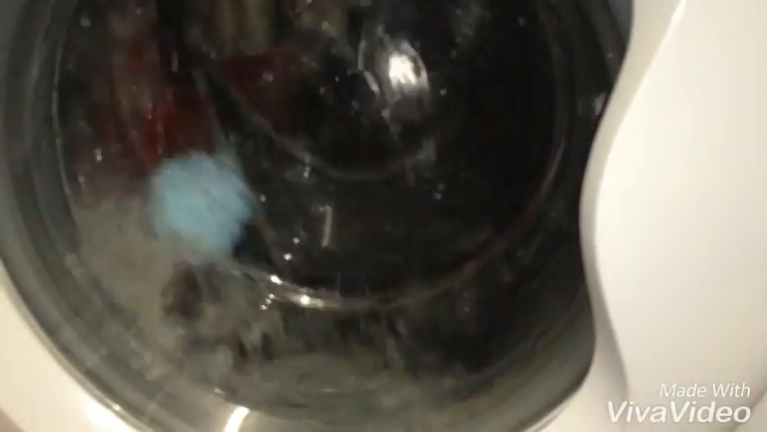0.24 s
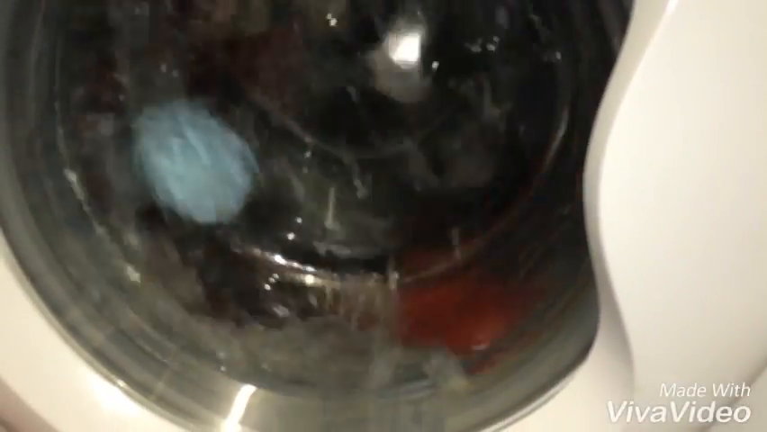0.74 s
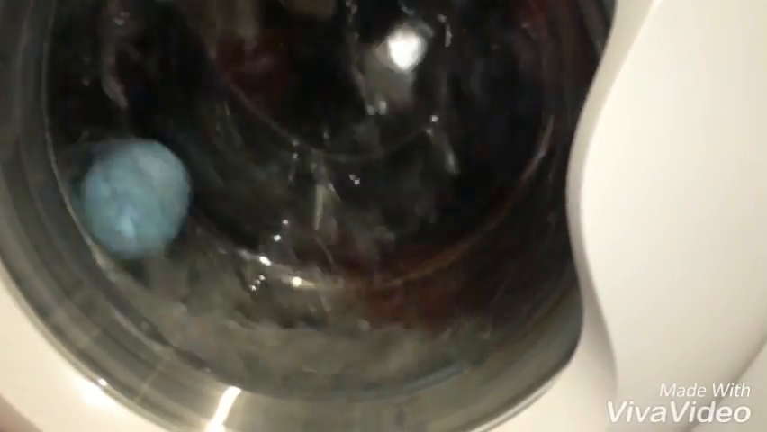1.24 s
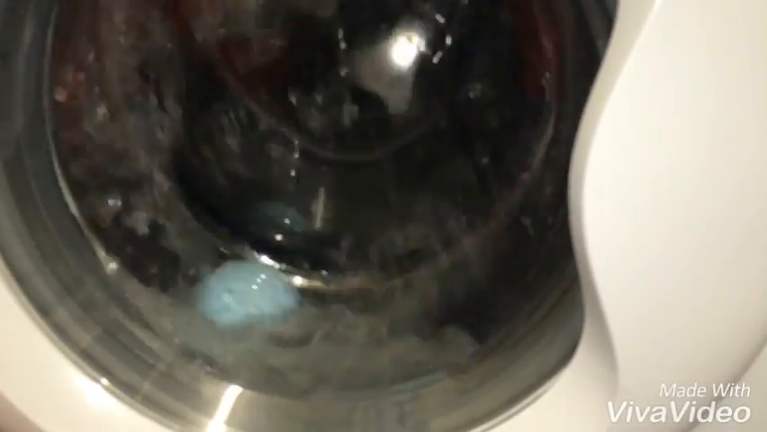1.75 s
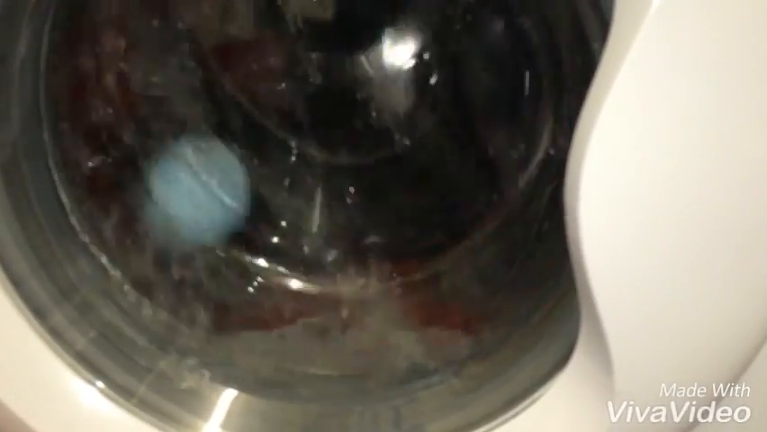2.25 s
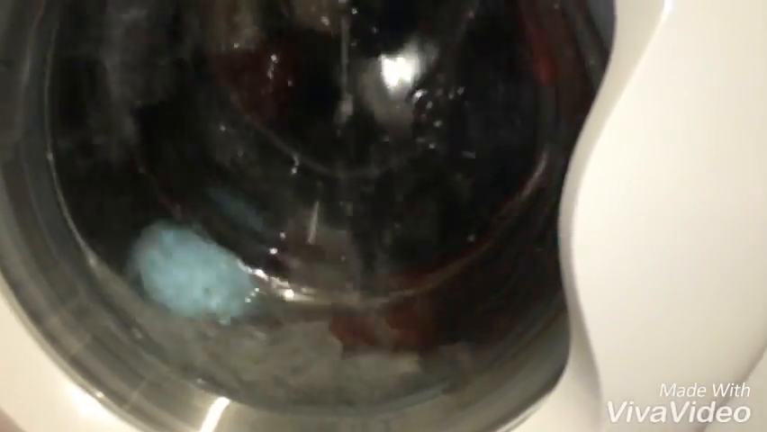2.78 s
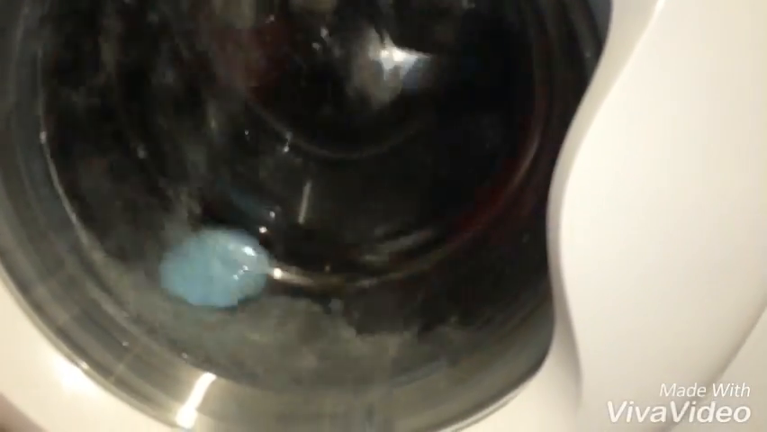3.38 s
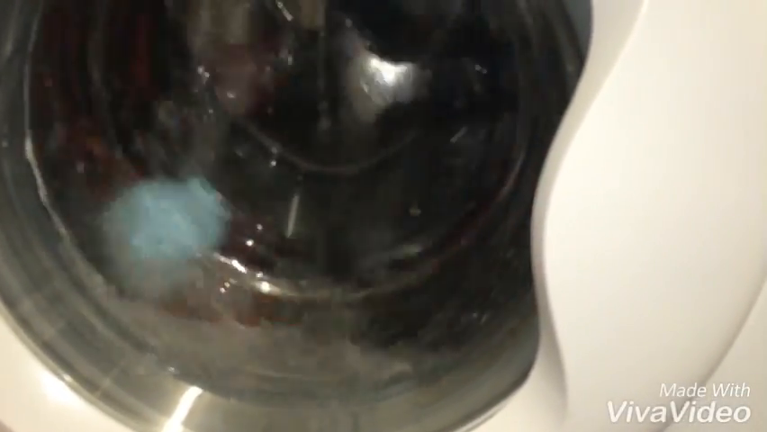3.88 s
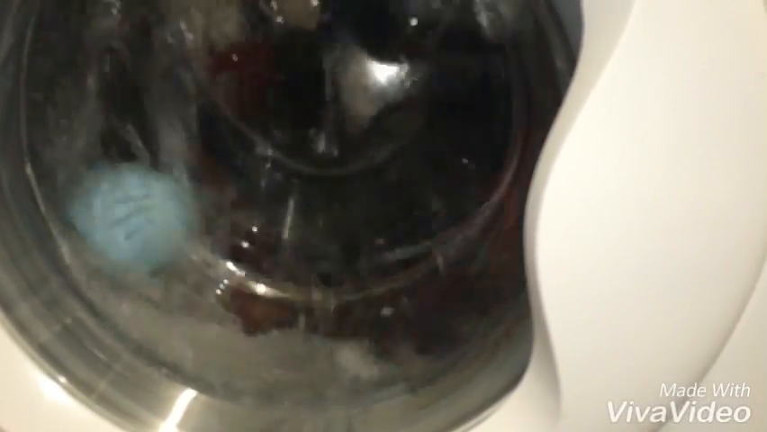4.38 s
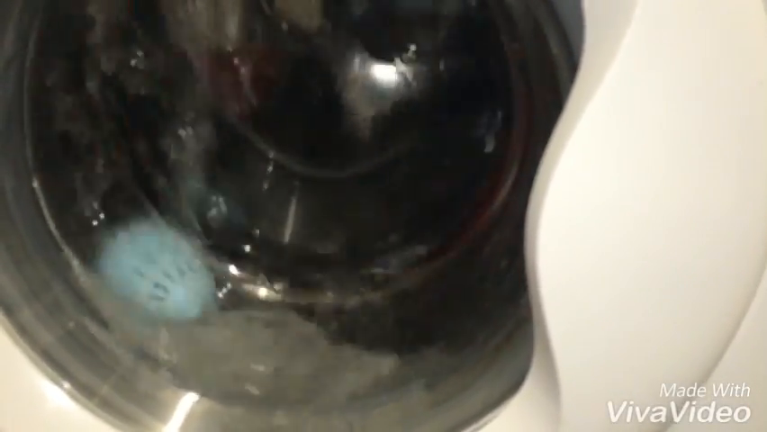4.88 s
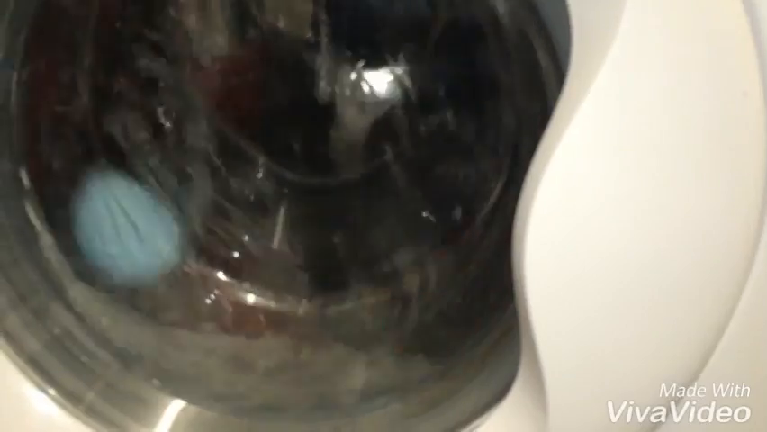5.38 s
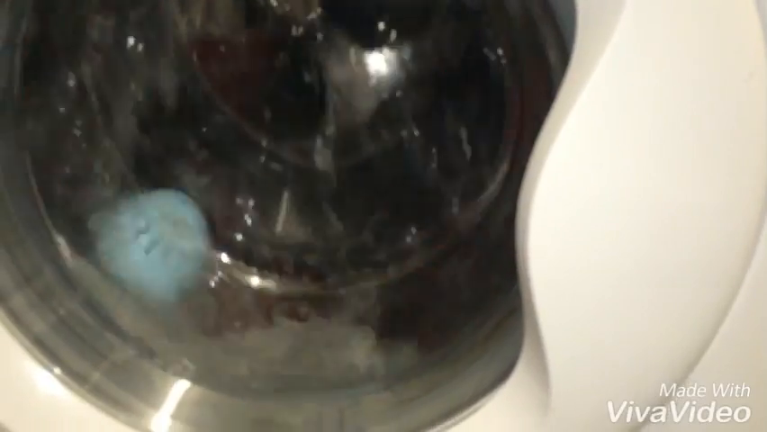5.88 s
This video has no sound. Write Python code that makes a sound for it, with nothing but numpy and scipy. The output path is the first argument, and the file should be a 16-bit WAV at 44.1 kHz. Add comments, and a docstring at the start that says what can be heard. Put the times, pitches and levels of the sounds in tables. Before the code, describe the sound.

A front-loading washing machine rinses laundry, heard close at its door indoors. Water churns and sprays from the start, surging briefly before settling to an even wash. Soaked loads fall irregularly with deep, hollow booms of drum and cabinet, some edged by a wet slap. Small drops and hard bits tick on glass and steel, and a faint thin motor whine holds throughout.

```python
"""A front-loading washing machine rinses wet laundry and a plastic dosing ball, one microphone close at its door.
From the start water churns and sprays behind the glass, in a surge that fades before 0.8 s, and the motor whines.
Load after load falls from the first moment to the last: modes of tub, cabinet, drum and panels ring as decaying
sines, with a noisy slap just ahead. From 0.2 s clear drops and hard bits tick on glass and steel; the water is
shaped noise and short random rings, the motor a set of thin sines."""
import sys
import numpy as np
from scipy import signal
from scipy.io import wavfile

SR = 44100
rng = np.random.default_rng(int(sys.argv[2]) if len(sys.argv) > 2 else 0)


def bounce(signal):
    """Save signal as a 16-bit WAV file at the path given by the first command-line argument."""
    frames = np.transpose(np.atleast_2d(signal))
    limited = np.clip(frames, -1, 1)
    pcm = np.round(limited * 32767).astype(np.int16)
    wavfile.write(sys.argv[1], SR, pcm)


def linear_from_db(decibels):
    """Turn decibels (scalar or array-like) into linear amplitude factors; 0 gives 1."""
    return 10 ** (np.asarray(decibels, float) / 20)


N = 270333    # samples, about 6.1 s
SLAP_LEAD_S = 0.0008    # a slap comes this far ahead of its boom


def unit(x):
    """Scaled to rms 1."""
    return x / np.sqrt(np.mean(x ** 2) + 1e-20)


def drift(rate_hz):
    """Slow random wander of spread 1, changing about rate_hz times a second."""
    step = 40    # samples between the points that are drawn
    r = np.exp(-2 * np.pi * step * rate_hz / SR)
    white = rng.standard_normal(N // step + 2002)
    slow = signal.lfilter([1], [1, -2 * r, r * r], white)[2000:]    # without the filter's start
    return np.interp(np.arange(N) / step, np.arange(len(slow)), unit(slow))


def ring(clicks, hz, t60_s):
    """A resonance: a unit click sets off a decaying sine of height 1."""
    r = linear_from_db(-60 / (t60_s * SR))
    w = 2 * np.pi * hz / SR
    return signal.lfilter([0, np.sin(w)], [1, -2 * r * np.cos(w), r * r], clicks + 1e-18)


def bandpass(x, order, low_hz, high_hz):
    """Keeps one band of a sound."""
    return signal.sosfilt(signal.butter(order, [low_hz, high_hz], "band", fs=SR, output="sos"), x)


def clicks_at(times_s, sizes):
    """A train of single clicks."""
    out = np.zeros(N)
    places = np.clip((np.asarray(times_s) * SR).astype(int), 0, N - 1)
    np.add.at(out, places, sizes)
    return out


def grains(per_s, spread_db):
    """Random clicks, many small and a few large, of either sign."""
    sizes_db = spread_db * np.minimum(rng.exponential(1, N), 5)
    signs = rng.choice([-1, 1], N)
    return linear_from_db(sizes_db) * signs * (rng.random(N) < per_s / SR)


def soften(x, seconds):
    """Wet cloth spreads a blow over a short time: an exponential smoothing."""
    r = np.exp(-1 / (seconds * SR))
    return signal.lfilter([1 - r], [1, -r], x)


# balance of the water's spectrum: pitch_hz, level_db (relative, per Hz)
WATER_COLOUR = [(88, -30), (150, 1.5), (331, -7.5), (507, -6.5), (603, -18), (704, -6), (997, -7.5),
                (1140, -11), (1710, -13.5), (2570, -17.5), (3060, -39), (3500, -25.5), (4960, -35.5),
                (12300, -44.5), (15200, -52.5)]


def colour_db(hz):
    """The water's relative spectrum at a frequency, read along log frequency."""
    pitch_hz, level_db = np.transpose(WATER_COLOUR)
    return np.interp(np.log(hz), np.log(pitch_hz), level_db)


def wash(slosh_db, spray_db, patchy_db):
    """The dense rush of water in third-octave noise bands: slosh rules the low ones, spray the high ones."""
    treble_calm = 0.29    # the spray is steadier: share of the patchiness lost in the top bands
    edges_hz = 150 * 2 ** np.arange(0, 6.8, 1 / 3)
    white = rng.standard_normal((2, N))
    together = drift(14)
    low, high = 0, 0
    for k, (low_hz, high_hz) in enumerate(zip(edges_hz, edges_hz[1:])):
        band = bandpass(white[k % 2], 2, low_hz, high_hz)
        octaves_up = np.log2(low_hz / 2000)
        patchiness = 1 - treble_calm * np.clip(octaves_up / 2, 0, 1)
        waver_db = patchiness * patchy_db * (0.51 * together + drift(14.4))
        band = band * linear_from_db(colour_db(np.sqrt(low_hz * high_hz)) + waver_db)
        share = np.clip(octaves_up / 1.67, 0, 1)
        low = low + (1 - share) * band
        high = high + share * band
    return linear_from_db(slosh_db - 2) * unit(low) + linear_from_db(spray_db - 2) * unit(high)


def bubbles(low_hz, high_hz, per_s, cycles, spread_db, clump_db, count):
    """Bursts come in clumps and ring some cycles at pitches spread over the range; rms 1."""
    pops = grains(per_s * linear_from_db(clump_db * drift(10)), spread_db)
    dealt = rng.integers(0, count, N)    # which pitch each pop takes
    total = 0
    for k, hz in enumerate(np.geomspace(low_hz, high_hz, count)):
        total = total + linear_from_db(colour_db(hz)) * hz * ring(pops * (dealt == k), hz, cycles / hz)
    return unit(total)


def spatter(spray_db):
    """Flung drops burst on the glass: short broad snaps of noise."""
    snaps = np.abs(grains(30 * linear_from_db(1.6 * drift(6.5)), spread_db=2.0))
    decay = np.exp(-1 / (0.0031 * SR))
    bursts = signal.lfilter([1], [1, -decay], snaps) * rng.standard_normal(N)
    return linear_from_db(spray_db - 10.5) * unit(bandpass(bursts, 1, 2500, 7000))


# resonances of door and drum: pitch_hz, width_hz, level_db (before a waver and the swell of the slosh)
CAVITY_MODES = [(514.4, 29, -53.5), (713.6, 67, -50.5), (1135.4, 52, -52), (1354, 144, -51.5),
                (2567, 97, -59), (3497, 120, -64), (908, 51, -57), (5990, 150, -71.5), (7080, 130, -73.5)]


def cavity(slosh_db):
    """Water noise rings on in the resonances of door and drum."""
    swell = linear_from_db(slosh_db - np.mean(slosh_db))
    total = 0
    for hz, width_hz, level_db in CAVITY_MODES:
        noise = unit(ring(rng.standard_normal(N), hz, 2.3 / width_hz))
        total = total + linear_from_db(level_db + 2.44 * drift(16.6)) * noise
    return swell * total


def water():
    """Rush, bubbles, spatter and resonance share one slosh and one spray level; a wave runs out at the start."""
    surge_db, surge_end_s, surge_fade_s = 3, 0.35, 0.38
    t = np.arange(N) / SR
    wave_db = surge_db * np.clip(1 - (t - surge_end_s) / surge_fade_s, 0, 1)
    slosh_db = -41.5 + wave_db
    spray_db = -57.5 + wave_db + 1.2 * drift(1.7)
    gurgle = bubbles(411, 2820, per_s=500, cycles=12.3, spread_db=1.0, clump_db=2.5, count=14)
    fizz = bubbles(2900, 16100, per_s=970, cycles=65.0, spread_db=3.0, clump_db=1.3, count=14)
    bubbling = linear_from_db(slosh_db - 10.0) * gurgle + linear_from_db(spray_db - 5.5) * fizz
    return wash(slosh_db, spray_db, patchy_db=2.5) + bubbling + spatter(spray_db) + cavity(slosh_db)


# motor drive tones, a carrier with sidebands among them: pitch_hz, level_db (rms, before a slow waver)
DRIVE_TONES = [(2200, -68), (3200, -72), (3535, -79), (4079, -79), (4177, -82), (4225, -75), (4275, -71),
               (4324, -79), (4373, -76), (4472, -82), (8061, -86), (8256, -84), (8305, -86), (8451, -87)]


def motor():
    """The drive's thin steady tones: sines that waver a little in level."""
    t = np.arange(N) / SR
    total = 0
    for hz, level_db in DRIVE_TONES:
        tone = np.sin(2 * np.pi * (hz * t + rng.random()))
        total = total + np.sqrt(2) * linear_from_db(level_db + 2 * drift(1.6)) * tone
    return total


# falls in the drum: start_s, weight_db (on the cabinet), boom_db (drum), knock_db (panels), slap_db
FALLS = [(0.0112, -31, -11, -18.5, -40), (0.14, -29, -37, -42, -66), (0.2616, -37, -29.5, -50, -36.5),
         (0.3500, -6, -8, -10.5, -27.5), (0.5722, -4, -9, -42, -42), (0.7820, -2, -9.5, -6, -30.5),
         (0.954, -28, -20.5, -50, -47), (1.139, -3, -8.5, -15, -36), (1.2621, -5.5, -18.5, -32, -45),
         (1.3835, -23, -21, -23.5, -50), (1.8478, -55, -58, -24, -49), (2.027, -12, -22, -29, -43.5),
         (2.076, -12, -17.5, -34, -52), (2.094, -5.5, -15.5, -38, -60), (2.2499, -31, -19, -21.5, -62),
         (2.733, -7.5, -14, -50, -44), (2.8091, -6, -19.5, -31, -60), (2.864, -11, -26, -46, -63),
         (2.9665, -8.5, -10.5, -26.5, -49), (3.0935, -50, -24.5, -40, -51), (3.292, -17, -13, -25, -43.5),
         (3.578, -9.5, -21, -38, -57), (3.6821, -3.5, -21.5, -50, -60), (3.861, -50, -24, -50, -60),
         (4.0576, -12, -13.5, -14.5, -38.5), (4.2058, -1.5, -9, -19.5, -60),
         (4.3351, -25, -22.5, -25.5, -45), (4.4853, -4, -10, -18.5, -58), (4.5827, -16, -18, -15, -41),
         (4.7715, -14, -16, -32, -49), (4.9651, -5.5, -22, -22, -43), (5.0507, -5, -14.5, -13.5, -36.5),
         (5.2254, -2.5, -10, -14, -44), (5.256, -15, -24, -25.5, -39.5), (5.3674, -24, -18, -22, -47),
         (5.5279, -4, -7, -13.5, -42.5), (5.815, -35, -32.5, -45, -58), (5.9603, -4, -8, -27, -42.5),
         (6.098, -45, -22, -45.5, -62)]


def falls_by_group():
    """Rows of start_s, blow in dB on tub sway, cabinet, drum and panels, slap_db; soft heavy loads sway the tub."""
    start_s, weight_db, boom_db, knock_db, slap_db = np.transpose(FALLS)
    # a fall whose slap is above -41 dB against its weight sways the tub less
    hardness_db = np.maximum(slap_db - weight_db + 41, 0)
    sway_db = weight_db - 3.5 - 0.91 * hardness_db
    return np.transpose([start_s, sway_db, weight_db, boom_db, knock_db, slap_db])


# how hard the load tumbles between falls: start_s, level_db (rms)
TUMBLING = [(0.0, -34.5), (0.31, -44), (0.78, -38.5), (1.3, -47), (1.4, -54), (1.6, -41.5), (1.89, -45),
            (2.18, -37), (2.54, -42), (2.9, -40.5), (3.11, -42.5), (3.64, -47), (3.76, -34.5),
            (4.06, -47.5), (4.59, -39), (4.86, -44.5), (5.25, -40), (5.8, -41), (6.13, -38.5)]
# modes a fall rings: group (0 tub sway, 1 cabinet, 2 drum, 3 panels), pitch_hz, level_db (relative),
# t60_s, swing (direction of the first swing, +1 or -1)
BODY_MODES = [(0, 65.1, -10, 0.27, 1), (1, 89.8, -6.5, 0.075, -1), (2, 118.8, 1, 0.13, -1),
              (2, 130.1, 0, 0.14, 1), (3, 169, -21, 0.24, 1), (3, 218.9, -12.5, 0.23, 1),
              (3, 238, 4, 0.027, -1), (3, 246.3, -15.5, 0.2, 1), (3, 382.3, -17.5, 0.16, 1),
              (3, 209.4, -19.5, 0.16, -1), (3, 302, -15.5, 0.071, 1)]


def drum():
    """Falls strike the modes in step; small tumbles keep them rumbling, and the load settles raggedly after a fall."""
    tumbling_db = np.interp(np.arange(N) / SR, *np.transpose(TUMBLING))
    rows = falls_by_group()
    start_s = rows[:, 0]
    tumbles = unit(grains(90 * linear_from_db(4 * drift(5.5)), spread_db=3.5)) + linear_from_db(-5.5) * rng.standard_normal(N)
    settling = clicks_at(start_s + 0.0068, SR * 0.046 * linear_from_db(rows[:, 3]))
    settling = soften(settling, 0.023) * grains(250, spread_db=2.5)
    uneven_db = 3.7 * rng.standard_normal((len(rows), len(BODY_MODES)))
    falls, rumble, ragged = 0, 0, 0
    for (group, hz, level_db, t60_s, swing), chance_db in zip(BODY_MODES, uneven_db.T):
        group = int(round(group))
        gain = np.sign(swing) * linear_from_db(level_db)
        blow_db = rows[:, 1 + group]
        if group == 3 and t60_s > 0.05:    # the longer panel modes answer each fall differently
            blow_db = blow_db + chance_db
        falls = falls + gain * ring(clicks_at(start_s, linear_from_db(blow_db)), hz, t60_s)
        rumble = rumble + gain * linear_from_db([-2, 7, -1.5, -3.5][group]) * ring(tumbles, hz, t60_s)
        if group == 3:
            ragged = ragged + gain * ring(settling, hz, t60_s)
    return soften(falls + linear_from_db(-29.5) * ragged, 0.00013) + linear_from_db(tumbling_db) * unit(rumble)


# short rings of the door under a slap: pitch_hz, level_db (relative), t60_s
DOOR_MODES = [(470, 11.5, 0.026), (550, 4, 0.044), (1400, 7, 0.012), (2100, -1.5, 0.0072),
              (2540, -7, 0.037)]


def slaps():
    """The hard edge of a fall: a broad crack, one flex of the glass, and the door rings briefly."""
    rows = falls_by_group()
    edge = clicks_at(rows[:, 0] - SLAP_LEAD_S, linear_from_db(rows[:, 5]))
    rough = soften(edge, 0.0032) * 0.0015 * SR * rng.standard_normal(N)
    crack = bandpass(rough, 2, 700, 3500)
    flex = -linear_from_db(17.5) * ring(edge, hz=423, t60_s=0.011)
    door = sum(linear_from_db(level_db) * ring(edge, hz, t60_s) for hz, level_db, t60_s in DOOR_MODES)
    return flex + linear_from_db(5) * crack + linear_from_db(1.5) * door


def burst(times_s, level_db, seconds, low_hz, high_hz):
    """Noise that starts at once and dies exponentially, in a band."""
    fading = soften(clicks_at(times_s, linear_from_db(level_db)), seconds) * seconds * SR
    return bandpass(fading * rng.standard_normal(N), 2, low_hz, high_hz)


def smacks():
    """A slap throws spray on the glass: a burst of treble noise 9 dB under the slap's own setting."""
    rows = falls_by_group()
    return burst(rows[:, 0] - SLAP_LEAD_S, rows[:, 5] - 9, seconds=0.0034, low_hz=3500, high_hz=8000)


# the clearest drops and hard bits on glass and steel: start_s, level_db, pitch_hz, width (about octaves)
CLEAR_TICKS = [(0.189, -33.5, 8600, 0.42), (0.194, -33, 775, 0.05), (0.203, -34, 2660, 0.57),
               (0.211, -28.5, 1320, 0.3), (0.258, -35, 1400, 1), (0.282, -41, 13980, 0.05),
               (0.405, -34, 2920, 1.6), (0.407, -21.5, 1316, 0.75), (0.409, -40, 5100, 1.5),
               (0.473, -37, 2610, 0.44), (0.671, -35.5, 4970, 0.1), (0.879, -44, 7070, 0.32),
               (0.907, -28.5, 2610, 0.057), (1.163, -46, 8700, 0.08), (1.171, -41, 2970, 0.05),
               (1.3, -43, 5000, 0.28), (1.387, -35.5, 2540, 0.05), (1.612, -46, 13020, 0.08),
               (1.622, -29.5, 2610, 0.07), (1.654, -31, 1040, 0.055), (1.75, -45, 6720, 0.3),
               (1.973, -44, 7070, 0.05), (2.1, -35, 2620, 0.05), (2.214, -44, 4760, 0.17),
               (2.32, -47, 10980, 0.2), (2.326, -38, 7080, 0.05), (2.547, -36, 2100, 0.08),
               (2.864, -35, 2650, 0.046), (3.074, -40, 2680, 0.29), (3.087, -43, 9700, 0.7),
               (3.108, -39, 3240, 0.48), (3.297, -37.5, 2480, 0.45), (3.39, -40, 2560, 0.08),
               (3.589, -29, 1320, 0.091), (3.732, -44, 6230, 0.05), (3.809, -45, 6960, 0.05),
               (4.235, -47, 10610, 0.32), (4.235, -43, 5640, 0.41), (4.555, -35, 2540, 0.2),
               (4.625, -41, 3800, 0.063), (4.655, -49, 10680, 0.2), (4.693, -54, 13100, 0.7),
               (4.693, -37, 6930, 0.76), (4.88, -32, 2650, 0.08), (4.964, -36, 5650, 1.9),
               (5.224, -36.5, 4970, 1.2), (5.381, -38.5, 5800, 0.39), (5.405, -40, 3830, 0.59),
               (5.427, -43, 5670, 0.22), (5.253, -49, 10800, 0.1), (5.454, -50, 13390, 0.37),
               (5.525, -45, 10900, 0.64), (5.958, -45, 11040, 0.88), (5.987, -47, 10550, 0.18),
               (5.989, -44, 5670, 0.05)]
# modes of glass and steel for fainter random ticks: pitch_hz, level_db (both varied a little tick by tick)
FAINT_MODES = [(2620, -39), (4800, -54), (5750, -53), (7080, -49), (8800, -57), (10900, -59), (13400, -51)]


def all_ticks():
    """Clear ticks and faint random ones, as (start_s, level_db, pitch_hz, t60_s, width)."""
    when, which, size, bend = rng.random((36, 4)).T    # 36 faint ticks
    hz, level_db = np.array(FAINT_MODES)[(which * len(FAINT_MODES)).astype(int)].T
    level_db = level_db + 7.8 * (size - 0.5)
    hz = hz * (1 + 0.036 * (bend - 0.5))
    faint = np.transpose([when * N / SR, level_db, hz, 0.22 * bend])
    # a tick rings 17 ms plus 32 cycles
    return [(s, db, hz, 0.017 + 32 / hz, width) for s, db, hz, width in [*CLEAR_TICKS, *faint]]


def ticks():
    """A tick swells over a few cycles and rings; a splashy one scatters fainter partials over its width, which
    ring a little longer than its tone."""
    length, count = 2400, 12    # samples of a tick, partials of its splash
    out = np.zeros(N + length)
    t = np.arange(length) / SR
    rows = all_ticks()
    chance = rng.random((len(rows), 2, count, 1))
    places = np.linspace(-0.5, 0.5, count)[:, None]
    for (start_s, level_db, hz, t60_s, width), (jitter, phase) in zip(rows, chance):
        octaves = (1.305 * width + 0.071) * (places + (jitter - 0.5) / count)
        ratios = 2 ** octaves
        partial_hz = np.minimum(hz * ratios, 0.36 * SR)
        partials = np.sin(2 * np.pi * (partial_hz * t + phase)) / ratios
        splash = linear_from_db(-12.5 - 60 * t / (1.1 * t60_s + 0.0051)) * partials.sum(axis=0)
        tone = linear_from_db(-60 * t / max(t60_s, 0.005)) * np.sin(2 * np.pi * hz * t) / (1 + 0.59 * width)
        swell = 1 - np.exp(-t / (0.0004 + 1.5 / hz))
        tick = swell * (tone + splash)
        # scaled to carry about the energy of a plain ring of this decay
        size = np.sqrt(np.sum(tick ** 2) / (t60_s * SR / 30))
        first = int(start_s * SR)
        out[first:first + length] += linear_from_db(level_db) * tick / size
    return out[:N]


def scene():
    """Water, motor and drum, all close to one microphone."""
    mix = water() + motor() + drum() + slaps() + smacks() + ticks()
    return mix[None]


def roll_off(x):
    """The treble ends steeply here."""
    return signal.sosfilt(signal.butter(12, 15360, fs=SR, output="sos"), x)


def record(dry):
    """The small microphone drops the deepest bass, below about 33 Hz."""
    thin = signal.sosfilt(signal.butter(2, 33, "high", fs=SR, output="sos"), dry)
    return roll_off(thin)


dry = scene()
out = record(dry)
bounce(out)
```